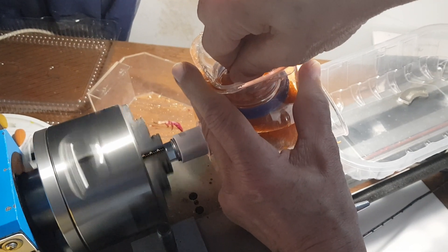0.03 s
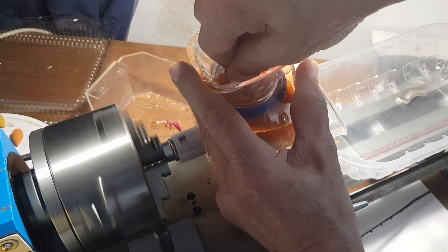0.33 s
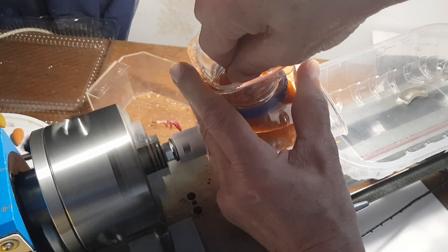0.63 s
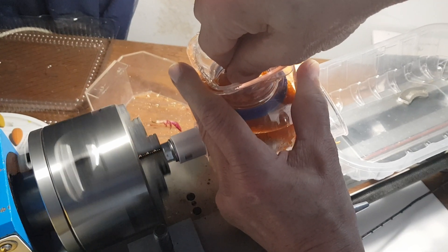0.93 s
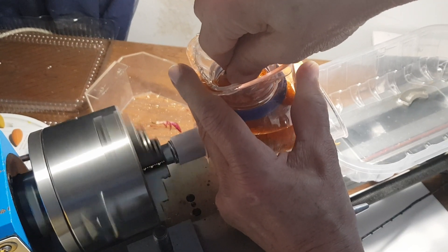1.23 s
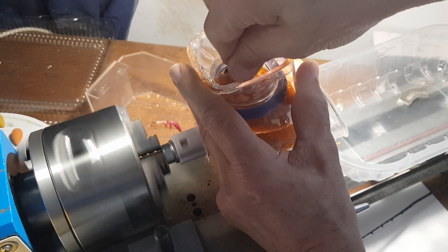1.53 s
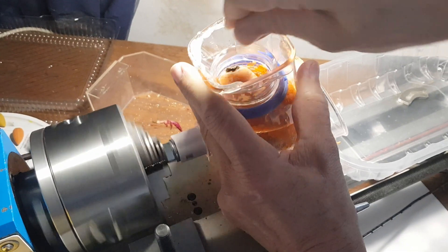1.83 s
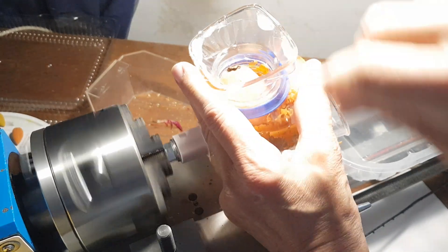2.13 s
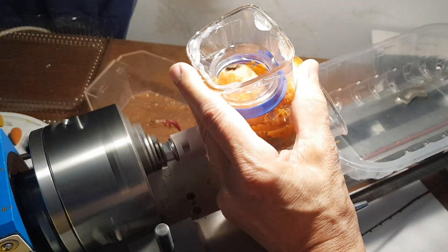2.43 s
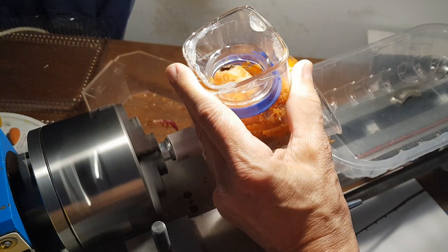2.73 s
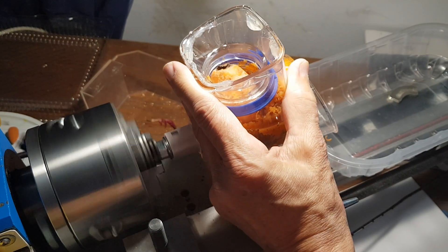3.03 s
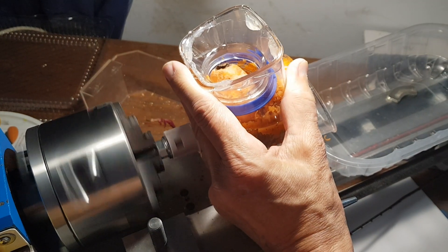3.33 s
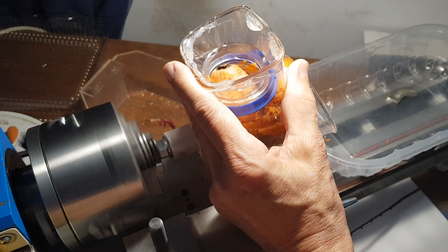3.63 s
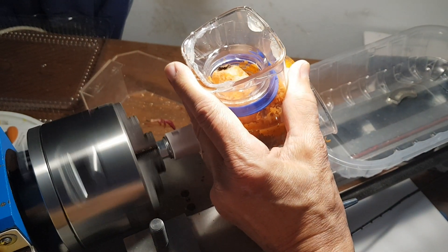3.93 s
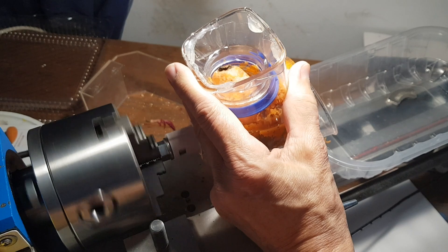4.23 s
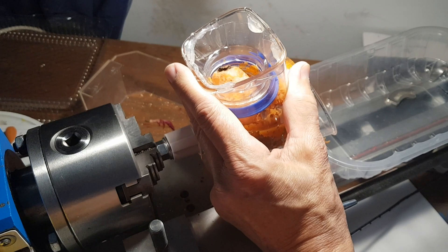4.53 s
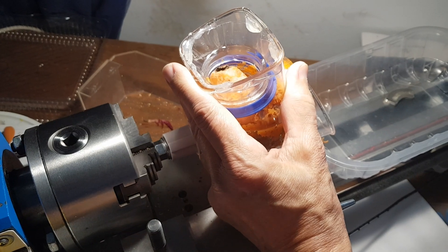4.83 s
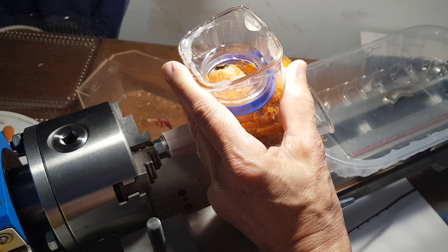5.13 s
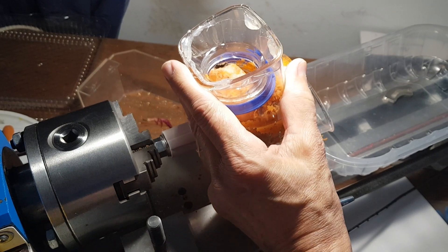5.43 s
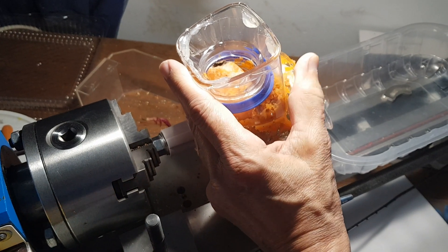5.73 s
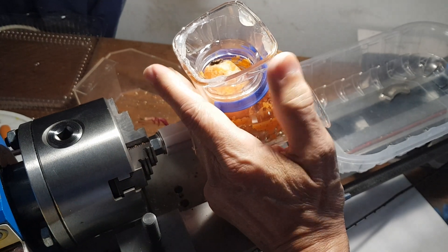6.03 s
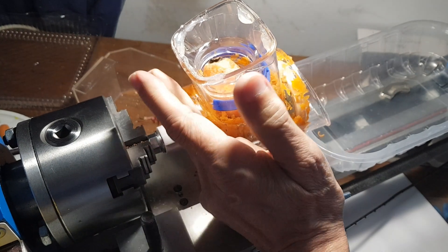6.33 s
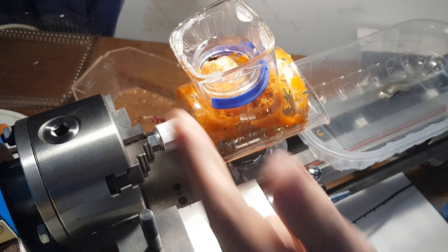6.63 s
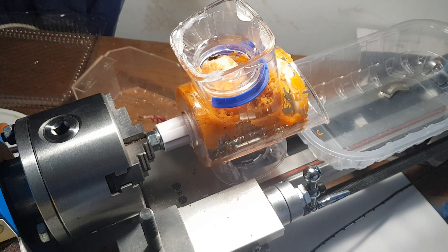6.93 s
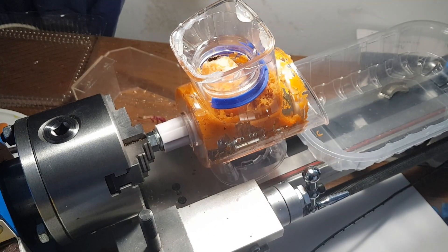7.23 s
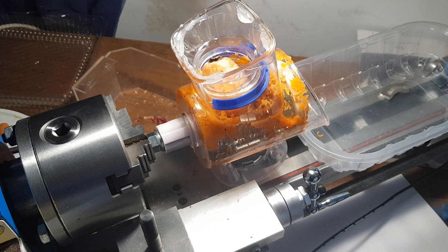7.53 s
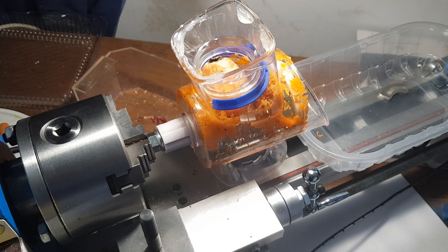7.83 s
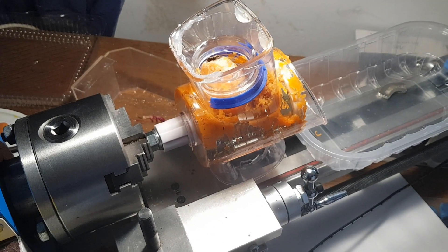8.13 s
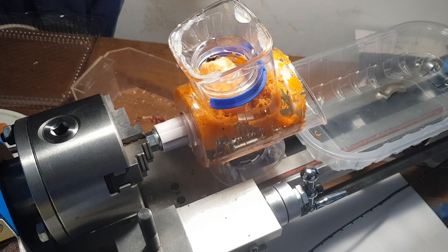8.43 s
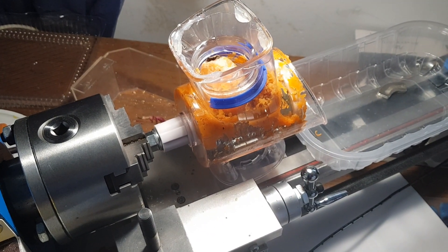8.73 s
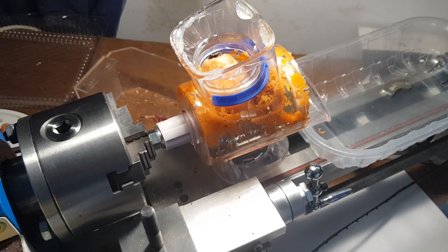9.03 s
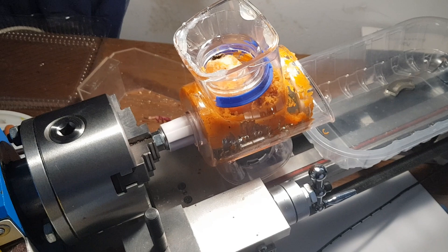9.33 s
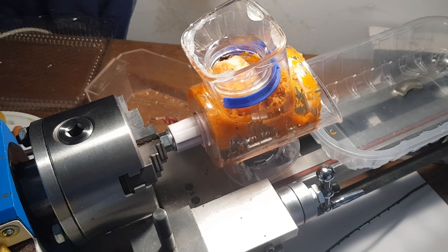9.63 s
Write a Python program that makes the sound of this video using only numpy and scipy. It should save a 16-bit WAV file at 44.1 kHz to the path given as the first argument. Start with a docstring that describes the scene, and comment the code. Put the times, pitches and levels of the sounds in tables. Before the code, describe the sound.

A small lathe drives a rasping vegetable grater until it knocks and clacks to a stop, followed by a few soft bumps.

```python
"""A motor hums, a drive whirs and blades shred vegetables twice a turn: a small lathe turns a plastic
drum grater. The pressure on the food eases, a piece knocks in the drum, and the machine stops with a
clatter and a sharp clack. Then soft rubbing and a few close bumps, over the faint hiss of the workshop.
Mains harmonics make the hum, dense clicks the whir, tearing and rubbing, ringing modes the knocks."""
import sys
import numpy as np
from scipy import signal
from scipy.fft import rfft, irfft
from scipy.io import wavfile
from scipy.ndimage import uniform_filter1d

SR = 44100
rng = np.random.default_rng(int(sys.argv[2]) if len(sys.argv) > 2 else 0)


def dump(signal):
    """Clip the signal to [-1, 1] and save it as 16-bit WAV at the path in sys.argv[1]."""
    limited = np.clip(np.atleast_2d(signal).T, -1, 1)
    pcm = np.round(limited * 32767).astype(np.int16)
    wavfile.write(sys.argv[1], SR, pcm)


N = 432180
T = np.arange(N) / SR
SIDES = np.array([[1], [-1]])  # left, right
MAINS_HZ, TURN_HZ = 50, 3.96
FIRST_CUT_S, STOP_S = 0.002, 4.0


def amp(db):
    """dB to gain."""
    return 10 ** (np.asarray(db) / 20)


def unit(x):
    """Scale to rms 1."""
    return x / np.sqrt(np.mean(x ** 2))


def response(points, size):
    """An (f/Hz, value) table on the FFT bins."""
    hz, values = np.transpose(points)
    return np.interp(np.log(np.fft.rfftfreq(size, 1 / SR) + 1), np.log(hz), values)


def colour(x, points):
    """Filter by an (f/Hz, level/dB) table."""
    return irfft(rfft(x) * amp(response(points, x.shape[-1])), x.shape[-1])


def ring(x, resonances):
    """Pass through (f/Hz, width/Hz, level/dB) resonances; rms 1."""
    size = x.shape[-1]
    f = np.fft.rfftfreq(size, 1 / SR) + 1
    body = sum((-1) ** k * amp(db) / (1 + 1j * (f * f - hz * hz) / (f * width_hz))
               for k, (hz, width_hz, db) in enumerate(resonances))
    return unit(irfft(rfft(x) * body, size))


def stereo(pair):
    """Mid and side to left and right, alike in the bass."""
    # stereo width: f/Hz, side minus mid/dB
    width = [(50, -16.5), (200, -15), (380, -13.5), (500, -3), (720, -9.5), (1000, -5), (1400, 0),
             (2000, -5.5), (2800, -2), (6000, -0.5), (9000, -10), (13000, -16.5)]
    return pair[0] + SIDES * colour(pair[1], width)


def place(x, pan, lead):
    """Position a sound by (f/Hz, L-R/dB) and (f/Hz, left lead/rad) tables."""
    return irfft(rfft(x) * amp(SIDES * response(pan, N) / 2) * np.exp(0.5j * SIDES * response(lead, N)), N)


def noise(points, size=N):
    """Coloured stereo noise; rms 1."""
    return unit(colour(stereo(rng.standard_normal((2, size))), points))


def grains(per_s, spread_db, size=N):
    """Dense stereo clicks of uneven size; rms 1."""
    hits = rng.random(size) < per_s / SR
    gains = amp(spread_db * np.minimum(rng.exponential(size=size), 3))
    return unit(stereo(hits * gains * rng.choice([-1., 1.], (2, size))))


def walk(rate_hz):
    """Smooth random drift, spread near 1."""
    hold = int(SR / rate_hz)
    steps = np.repeat(rng.standard_normal(N // hold + 2), hold)
    return 1.3 * uniform_filter1d(uniform_filter1d(steps, hold), hold)[:N]


def swells(rows):
    """Envelope of Gaussian (t/s, peak/dB, length/s) swells."""
    return sum(amp(db) * np.exp(-(2 * (T - s) / length_s) ** 2) for s, db, length_s in rows)


def add(out, s, sound):
    """Mix a short sound in at time s."""
    i = int(s * SR)
    out[:, i:i + sound.shape[-1]] += sound[..., :N - i]


def strikes(blows, modes, crack, crack_db, crack_t60_s):
    """Each blow cracks and rings the body's modes; a soft contact cuts the treble."""
    out, t = np.zeros((2, N)), T[:16384]
    for s, db, cutoff_hz in blows:
        sound = amp(crack_db - 60 * t / crack_t60_s) * noise(crack, size=len(t))
        for hz, mode_db, t60_s in modes:
            # higher modes reach the two sides less in step
            phase = rng.uniform(0, 2 * np.pi) + SIDES * rng.normal() * min(hz / 2000, 1)
            detuned_hz = hz * (1 + 0.015 * rng.normal())
            sound += amp(mode_db - 60 * t / t60_s) * np.sin(2 * np.pi * detuned_hz * t + phase)
        add(out, s, amp(db) * signal.lfilter(*signal.butter(1, cutoff_hz, fs=SR), sound))
    return out


def room(x, wet_db, low_t60_s=0.44, high_t60_s=0.3):
    """Add a diffuse workshop echo whose treble dies first."""
    t = T[:32768]
    low = noise([(100, 7.5), (400, -4.5), (2000, -9.5), (4000, -10.5), (9000, -35.5)], size=len(t))
    high = noise([(1500, -29.5), (4500, 0.5), (14000, -3.0)], size=len(t))
    onset = np.clip(t / 0.012 - 0.5, 0, 1)
    tail = onset * (low * amp(-60 * t / low_t60_s) + 1.3 * high * amp(-60 * t / high_t60_s))
    return x + amp(wet_db) * signal.fftconvolve(x, unit(tail) / np.sqrt(len(t)), axes=1)[:, :N]


def workshop(rise_at_s=6.7, rise_s=0.59):
    """Steady hiss over a low rumble; a narrow band of hiss grows late."""
    # steady and late spectra: f/Hz, level/dB
    steady = [(25, -69), (45, -63.5), (110, -65), (280, -83.5), (650, -80.5), (1000, -87), (1600, -89.5),
              (1900, -77.5), (2150, -74), (2700, -88.5), (3250, -81.5), (3900, -93.5), (5200, -93),
              (7500, -99), (13000, -89.5), (16000, -93)]
    late = [(1500, -48), (2000, -4), (2200, -4), (2450, -11), (3000, -37)]
    # balance: f/Hz, L-R/dB
    pan = [(300, -0.5), (750, 2), (1200, 7), (1600, -2.5), (2400, 0), (3100, 0.5), (3600, -2.5), (4800, -7),
           (7000, 1), (9800, 0.5), (13000, -0.5)]
    # phase: f/Hz, left lead/rad
    lead = [(300, -0.68), (1000, -1.9), (1900, -2.3), (2400, -0.87), (3000, 0.34), (4300, 1.8), (7000, 0.6)]
    rise = np.clip((T - rise_at_s) / rise_s, 0, 1)
    return place(noise(steady) * amp(-64) + noise(late) * amp(-75) * rise, pan, lead)


def rustle(hz, width_hz, spread_db, size):
    """Tiny slips, twice filtered to one band; rms 1."""
    band = [(hz, width_hz, 0)]
    return ring(ring(grains(5000, spread_db, size), band), band)


def touches():
    """Fingers tap and shift on plastic; a sleeve brushes past."""
    # finger taps: t/s, level/dB, f/Hz, width/Hz, t60/s
    taps = [(5.814, -56, 650, 230, 0.13), (5.995, -63, 1300, 450, .07), (6.018, -60, 1400, 450, .07),
            (6.161, -59, 1400, 400, .09), (6.282, -57, 330, 120, .09), (6.566, -59, 330, 120, .1),
            (6.676, -62, 1300, 450, .06), (6.8105, -64, 1200, 400, 0.14), (7.951, -66, 504, 170, .08),
            (8.126, -59.5, 3360, 450, 0.083), (9.012, -42, 1720, 700, 0.013),
            (9.0578, -43, 1500, 500, 0.016), (9.057, -58, 11500, 2000, .012)]
    # sleeve brushes: t/s, peak/dB, length/s, f/Hz
    brushes = [(5.54, -75, .12, 5100), (6.154, -77, .2, 5200), (7.801, -76, .2, 1960),
               (8.17, -75, .09, 3700), (8.2, -76, 0.14, 5300), (8.3, -77, .12, 6000)]
    out, t = np.zeros((2, N)), T[:8192]
    for s, db, hz, width_hz, t60_s in taps:
        add(out, s, rustle(hz, width_hz, spread_db=2.2, size=len(t)) * amp(db - 60 * t / t60_s))
    t = T[:16384] - T[8192]
    for s, db, length_s, hz in brushes:
        envelope = amp(db) * np.exp(-(2 * t / length_s) ** 2)
        add(out, s + t[0], rustle(hz, 0.24 * hz, spread_db=2, size=len(t)) * envelope)
    return out


def rubbing(attack_s=0.021, release_db_per_s=71):
    """A hand rubs in tiny slips, fingers slide, and the rub deepens as the palm presses."""
    # hand and sleeve strokes: t/s, length/s, level/dB
    strokes = [(4.244, 0.039, -58.5), (4.38, 0.16, -56.5), (4.658, 0.31, -58), (5.07, 0.1, -57),
               (5.433, 0.091, -59), (5.794, 0.63, -59), (6.437, 0.27, -60.5), (6.81, 0.088, -60),
               (7.174, 0.041, -65), (7.373, 0.71, -64.5), (7.698, 0.1, -58.5), (8.471, 0.54, -73),
               (9.498, 0.33, -65)]
    # finger slides and palm presses: t/s, peak/dB, length/s
    slides = [(9.007, -54.5, 0.025), (9.014, -46.5, 0.011), (9.047, -53.5, 0.043), (9.096, -59.5, 0.079)]
    presses = [(5.974, -57.5, .16), (6.14, -61, 0.11), (6.287, -58, 0.095), (6.575, -58, 0.11),
               (6.716, -54, 0.053), (7.78, -57.5, 0.17)]
    # friction spectra: f/Hz, level/dB
    rub_spectrum = [(50, 2), (110, 4), (250, -6.5), (380, -0.5), (500, -6), (600, -10.5), (750, -11.5),
                    (950, -20.5), (1200, -11.5), (1700, -28.5), (3200, -24.5), (7000, -41)]
    slide_spectrum = [(200, -10), (600, 11), (1300, 1), (1900, -8), (2800, -2), (4000, -12), (6000, -19),
                      (8500, -37), (12000, -30), (16000, -36)]
    press_spectrum = [(60, -10), (140, -2), (250, 1), (370, -1), (520, -12), (900, -24), (2500, -44)]
    power = 0
    for s, length_s, db in strokes:
        attack = np.clip((T - s) / attack_s, 0, 1)
        power += (attack * amp(db - release_db_per_s * np.maximum(T - s - length_s, 0))) ** 2
    envelope = np.sqrt(power) * amp(2 * walk(30))
    rub = unit(colour(grains(1400, 1.84), rub_spectrum)) * envelope
    return rub + noise(slide_spectrum) * swells(slides) + noise(press_spectrum) * swells(presses)


def bumps(drag_s=0.025, drag_max_db=-52):
    """Fingers bump a nearby case: one heavily damped swing each, with a soft drag of skin."""
    # finger bumps: t/s, level/dB, f/Hz, L-R/dB
    hits = [(6.567, -52, 330, 0), (7.49, -53.5, 520, 8), (8.48, -51, 446, -13), (8.505, -44, 420, -7),
            (8.568, -56, 272, -19), (8.683, -49, 473, -4), (8.709, -44, 460, 7), (8.715, -44, 160, -4),
            (8.754, -54.5, 190, -16), (8.814, -52, 298, 6), (8.859, -52.5, 200, 5), (8.895, -50, 385, 5),
            (8.933, -49.5, 300, -10), (9.012, -29, 650, 2), (9.015, -25, 357, 9.5),
            (9.0575, -40.5, 1210, 16), (9.109, -54, 200, 14)]
    # skin drag: f/Hz, level/dB
    drag_spectrum = [(50, 6), (120, 7.5), (250, -5.5), (500, -6), (750, -14.5), (1100, -41), (3000, -43)]
    out, t = np.zeros((2, N)), T[:4096]
    for s, db, hz, pan_db in hits:
        cycles = hz * t - 2
        swing = np.exp(-(cycles / 0.6) ** 2) * np.cos(2 * np.pi * cycles)
        add(out, s - 2 / hz, amp(db + SIDES * pan_db / 2) * swing)
        drag = noise(drag_spectrum, size=len(t)) * np.exp(-(2 * t / drag_s - 2) ** 2)
        add(out, s + 0.0078 - drag_s, amp(min(db - 4, drag_max_db)) * drag)
    return room(out, wet_db=-20.5)


def bench():
    """Muffled knocks ring the bench."""
    # knocks: t/s, relative level/dB, cutoff/Hz
    blows = [(3.794, -37, 4000), (4.347, -46.5, 500), (5.151, -45, 1510), (5.158, -38.5, 3000),
             (5.174, -59, 3000), (5.19, -53.5, 2000), (5.473, -51.5, 1020), (6.168, -64, 3000)]
    # bench modes: f/Hz, level/dB, t60/s
    modes = [(353, -14, 0.47), (436, -0.5, 0.092), (600, -8, 0.04), (681, -0.5, 0.052), (924, -10.5, 0.12),
             (1080, -18, 0.15), (1274, -8, 0.12), (2300, -12.5, 0.11)]
    # contact noise: f/Hz, level/dB
    crack = [(100, -23.5), (350, 2), (480, -17), (720, -2.5), (950, 0), (1250, -8), (1600, -15),
             (2300, -28), (4000, -39)]
    knocks = strikes(blows, modes, crack, crack_db=-6.5, crack_t60_s=0.12) * amp(-5)
    muffled = colour(knocks, [(150, -22), (300, 4.0), (2400, 9.0), (3500, -20.5), (8000, -50)])
    return room(muffled, wet_db=-8)


def thuds():
    """Soft, deep swings of a few cycles."""
    # low thuds and a small tock: t/s, level/dB, f/Hz, half-length/s
    pulses = [(1.365, -25, 39.2, 0.03), (1.595, -38, 43, 0.039), (2.525, -34.5, 146, 0.012),
              (3.647, -25.5, 41.7, 0.02), (3.917, -33.5, 40, 0.022), (4.083, -34, 41, 0.026),
              (6.687, -44, 150, 0.0046), (6.719, -63, 270, 0.008), (7.495, -49, 504, 0.0058)]
    return sum(amp(db) * np.exp(-((T - s) / half_s) ** 2) * np.cos(2 * np.pi * hz * (T - s))
               for s, db, hz, half_s in pulses)


def scrapes():
    """A piece sticks and slips along the container and leaves it ringing."""
    # scrapes: t/s, peak/dB, length/s
    runs = [(2.284, -38.5, .024), (2.403, -36, 0.017), (2.416, -38, 0.022)]
    # container resonances: f/Hz, width/Hz, level/dB
    container = [(1200, 66, 10.5), (1750, 390, 3), (2470, 70, 3.5), (2700, 55, 5.5), (3570, 75, 4.5),
                 (4200, 570, -8.5), (5140, 220, -8), (6000, 280, -12.5), (7200, 400, -18),
                 (13400, 3100, -12)]
    slips = grains(4000, 0.67) * swells(runs)
    return ring(slips, container) * np.std(slips)


def chute_ticks():
    """A hard piece ticks against the hollow feed chute."""
    # ticks: t/s, level/dB, cutoff/Hz
    blows = [(2.5122, -27, 8900), (2.5165, -26, 3000), (2.5245, -32, 5000)]
    # chute modes: f/Hz, level/dB, t60/s
    modes = [(258, -6, 0.036), (1450, -0.5, 0.037), (1710, 1.5, 0.039), (3580, -5, 0.028),
             (4900, -8, 0.011)]
    # contact noise: f/Hz, level/dB
    crack = [(100, -18), (600, -8), (1500, 5), (2600, -4), (3600, -1), (5200, -1), (6500, -17), (8200, -31),
             (13000, -13), (16000, -22)]
    return strikes(blows, modes, crack, crack_db=-6.5, crack_t60_s=0.034)


def drum_knocks(bounce_s=0.0033):
    """The plastic drum chatters in its housing: five blows a knock, each weaker than the last."""
    # knocks: t/s, relative level/dB, cutoff/Hz, loss per bounce/dB
    knocks = [(3.799, -40.5, 1500, 1), (3.982, -30, 3986, 1), (3.9925, -16.5, 3490, 2.2)]
    # drum modes: f/Hz, level/dB, t60/s
    modes = [(364, -13.5, 0.2), (528, -13.5, 0.12), (793, -6.5, 0.05), (1200, -2, 0.038), (1430, -3, 0.069),
             (1848, -5, 0.045), (1920, -7, 0.044), (2200, 3.5, 0.03), (2930, -12.5, .03),
             (3390, -10, 0.023), (4256, -15, 0.03)]
    # contact noise: f/Hz, level/dB
    crack = [(100, -7.5), (400, -8), (1000, -1), (1800, -5.5), (2800, -7.5), (4500, -12.5), (8000, -31),
             (13000, -1.5), (16000, -10)]
    blows = [(s + k * bounce_s, db - k * loss_db, cutoff_hz)
             for s, db, cutoff_hz, loss_db in knocks for k in range(5)]
    return strikes(blows, modes, crack, crack_db=-1, crack_t60_s=0.055) * amp(-3)


def stop_clack():
    """The lathe's steel clacks as it stops; small ticks follow."""
    # clacks and ticks: t/s, level/dB, cutoff/Hz
    blows = [(4.0455, -14, 19900), (4.0545, -22.5, 4000), (4.064, -19.5, 1200), (4.25, -51, 1500),
             (4.266, -45, 1500), (4.3425, -43.5, 4500), (4.349, -49, 1200)]
    # steel modes: f/Hz, level/dB, t60/s
    modes = [(409, -17.5, 0.15), (490, -15.5, 0.07), (739, -14.5, 0.1295), (1162, -11.5, 0.064),
             (1500, -13.5, .04), (1820, -16.5, 0.032), (2450, -13, 0.027)]
    # contact noise: f/Hz, level/dB
    crack = [(100, -17.5), (230, -21.5), (350, -6), (520, -0.5), (1100, -9.5), (1450, -10), (2150, -1.5),
             (2800, -13.5), (3600, -5), (5000, -9.5), (7700, -18), (8600, -31.5), (11000, -10.5),
             (14000, -6), (15800, -15)]
    # balance: f/Hz, L-R/dB
    pan = [(300, 1.5), (1400, -1), (3700, -6), (6000, -12.5), (7500, -13), (9000, 3.5), (13000, -1.5),
           (15000, 2)]
    # phase: f/Hz, left lead/rad
    lead = [(300, -1.7), (600, .7), (900, -1), (1300, 3.2), (2000, 2.5), (3000, -.6), (5000, -2),
            (12000, 0.5)]
    clacks = strikes(blows, modes, crack, crack_db=-1.5, crack_t60_s=0.053)
    return place(room(clacks, wet_db=-12.5), pan, lead)


def load_at(s, ease_at_s=1.05, decay_s=1.04):
    """Drum load: 1 while the food is pressed down, then fading."""
    return np.exp(-np.maximum(s - ease_at_s, 0) / decay_s)


def hum(load, load_db=2, flutter_db=0.6, waver_db=2.5):
    """Magnetic pull shakes the motor at even mains multiples; the lowest line rises with load."""
    # hum lines: mains multiple (rounded to even), level/dB, L-R/dB (overtones only)
    lines = [(4, -37, -2.5), (6, -71, -2), (8, -52.5, 0), (9.96, -67, 19.5), (12, -60.5, 11.5),
             (14, -70, 8), (16, -56.5, -3), (18, -58.5, -16), (19.88, -56.5, 2.5), (22, -68, 8.5),
             (24, -60, -2.5), (26, -68.5, -6), (28, -59.5, -11.5), (34, -76, -0.5), (36, -75.5, -2.5),
             (66, -76, -3.5), (68, -75, -4), (70, -71, -8.5), (72, -70, -12)]
    out, mains_phase = 0, 2 * np.pi * MAINS_HZ * T + 0.023 * walk(20)
    for k, (multiple, db, pan_db) in enumerate(lines):
        overtone = k > 0
        swing_db = waver_db * walk(20) if overtone else load_db * load + flutter_db * walk(20)
        blur = 0.011 * multiple * walk(90) * overtone  # rattling shakes overtones out of step
        phase = 2 * np.round(multiple / 2) * mains_phase + blur + rng.uniform(0, 2 * np.pi)
        out += np.sqrt(2) * amp(db + swing_db + SIDES * pan_db / 2 * overtone) * np.sin(phase)
    return out


def drive(load, swish):
    """Gears and bearings rattle in step with the hum; load brings out the housing's resonances."""
    # gear whir: f/Hz, level/dB
    whir_spectrum = [(40, -33), (75, -7.5), (130, -8), (200, -6.5), (290, -10), (380, -5), (480, -15),
                     (700, -15), (1100, -25.5), (1450, -15), (1950, -22), (2400, -30.5), (4700, -37.5),
                     (8000, -67.5)]
    # grater housing resonances: f/Hz, width/Hz, level/dB
    housing = [(349, 31, -3), (418, 35, -6), (596, 39, 1), (738, 26, 7), (801, 49, 0.5), (1236, 180, -8),
               (1400, 39, -5), (1815, 83, -8), (2000, 80, -8.5), (2742, 110, -19), (4770, 127, -17.5)]
    buzz = 1 + 0.6 * np.cos(2 * np.pi * 4 * MAINS_HZ * T)
    whir = unit(colour(grains(6000, 3.6) * buzz, whir_spectrum))
    rattle = ring(grains(2500, 2.75) * buzz, housing)
    # a small loose part sings, tapped at every swing of the field
    taps = np.cos(2 * np.pi * MAINS_HZ * T) ** 10
    sing = ring(grains(5460, 2) * taps, [(3290, 110, 0)]) * amp(-79 + 2.19 * walk(25))
    whir_db = -45 + 3.5 * load + 1.25 * walk(25)
    rattle_db = -53.5 + 14.5 * load + 1.1 * swish + walk(30)
    return whir * amp(whir_db) + rattle * amp(rattle_db) + sing


def cuts(length_s=0.035, jitter_s=0.011, trailing_db=-10, focus_hz=1040, scatter_octaves=0.21):
    """Two blade rows bite in turn, harder under load: t/s, tear/dB, rasp/dB, length/s, f/Hz."""
    k = np.arange(int(2 * TURN_HZ * STOP_S))
    late, strong, high = rng.standard_normal((len(k), 3)).T
    s = FIRST_CUT_S + k / (2 * TURN_HZ) + jitter_s * late
    bite_db = trailing_db * (k % 2) + 0.5 * strong
    tear_db = -53 + 2 * load_at(s) + bite_db
    rasp_db = -56.5 + 9 * load_at(s) + bite_db
    hz = focus_hz * 2 ** (scatter_octaves * high)
    return np.column_stack([s, tear_db, rasp_db, np.full(len(k), length_s), hz])


def rasps(bites, focus_db_per_octave=10):
    """Each bite's fractures ring the drum, most near its own pitch; the food detunes it a little."""
    # hollow drum resonances: f/Hz, width/Hz, level/dB
    drum = [(400, 79, 4), (740, 70, 5.5), (996, 210, -1.5), (1386, 97, 4), (1868, 99, 2), (2740, 150, -4.5),
            (3520, 190, -7)]
    out, t = np.zeros((2, N)), T[:8192] - T[4096]
    for s, db, length_s, focus_hz in bites:
        detune = 1 + 0.036 * rng.normal()
        body = [(hz * detune, width_hz, mode_db - focus_db_per_octave * abs(np.log2(hz / focus_hz)))
                for hz, width_hz, mode_db in drum]
        burst = ring(grains(2000, 2.4, size=len(t)), body) * amp(db) * np.exp(-(2 * t / length_s) ** 2)
        add(out, max(s + t[0], 0), burst[:, s + t >= 0])
    return out


def shredding(load, swish):
    """Blades tear countless cells; each cut and each caught piece rasps in the drum."""
    # blades catching loose pieces: t/s, tear/dB, rasp/dB, length/s, rasp focus/Hz
    catches = [(0.043, -48, -34, 0.033, 940), (0.197, -45.5, -37.5, 0.091, 1500),
               (0.28, -53, -38, 0.016, 1200), (0.316, -43, -37.5, 0.037, 750),
               (0.352, -43, -48, 0.017, 780), (0.486, -63, -36, 0.028, 1590), (0.556, -49, -37, .026, 860),
               (0.602, -44, -38, .02, 780), (0.756, -58, -38.5, 0.026, 1400),
               (0.823, -55, -37, 0.029, 1490), (0.859, -45, -37, .025, 800), (0.971, -45, -41, 0.017, 1600),
               (1.02, -59, -32.5, 0.019, 1200), (1.091, -58, -37.5, 0.024, 740),
               (1.289, -65, -37, 0.062, 1450), (1.485, -50, -35.5, 0.021, 1300),
               (1.539, -48.5, -38.5, 0.034, 1780), (1.623, -49, -40, 0.022, 1500),
               (1.738, -58, -37, .018, 1300), (1.792, -63, -40.5, 0.025, 1700),
               (1.879, -51.5, -39.5, 0.027, 750), (1.989, -55, -36.5, 0.022, 1520),
               (2.049, -54, -43, 0.037, 1600), (2.131, -59, -40, 0.03, 740), (2.245, -52, -43, 0.049, 1500),
               (2.375, -54, -54, 0.056, 1500), (2.627, -53, -45, 0.037, 1550), (2.752, -53, -52, .03, 1400),
               (2.891, -64, -46, .025, 1600), (3.08, -66, -46, 0.016, 1400), (3.268, -58, -45, 0.02, 1500),
               (3.323, -54.5, -49, 0.033, 1500), (3.524, -58, -39, 0.016, 1300)]
    # tearing: f/Hz, level/dB
    tear_spectrum = [(300, -31), (700, -7), (1100, -1), (1900, 1), (2300, -6), (3300, -6.5), (5000, -9),
                     (6500, -18), (8200, -29), (10000, -21), (12700, -10.5), (15800, -21.5)]
    s, tear_db, rasp_db, length_s, hz = np.vstack([cuts(), catches]).T
    steady_db = -59 + 14.5 * load + 0.44 * swish + walk(40)
    envelope = np.hypot(amp(steady_db), swells(zip(s, tear_db, length_s)))
    tearing = unit(colour(grains(7000, 2.5), tear_spectrum)) * envelope
    return tearing + rasps(zip(s, rasp_db, length_s, hz))


def machine(hum_fall_db_per_s=700, coast_db_per_s=65):
    """The lathe, slightly right: the hum ends with the current, the drum coasts a moment longer."""
    # balance: f/Hz, L-R/dB
    pan = [(300, -1.5), (700, -1), (1400, -3.5), (2400, -1), (3700, -3), (6000, -15.5), (7500, -12),
           (9000, 2), (13000, -4), (15000, 5)]
    # phase: f/Hz, left lead/rad
    lead = [(300, -0.05), (690, -0.15), (1050, 0.6), (1500, .7), (2000, 0.48), (2700, 0.12), (4500, 1),
            (7000, -0.51), (8500, 0)]
    load = load_at(T)
    swish = np.cos(2 * np.pi * 2 * TURN_HZ * (T - FIRST_CUT_S))  # two blade rows a turn
    stopped_s = np.maximum(T - STOP_S, 0)
    motor = hum(load) * amp(-hum_fall_db_per_s * stopped_s)
    turning = (drive(load, swish) + shredding(load, swish)) * amp(-coast_db_per_s * stopped_s)
    contacts = room(drum_knocks() + chute_ticks() + scrapes(), wet_db=-10.5)
    return motor + place(turning + contacts, pan, lead) + stop_clack()


def scene():
    """Bench, machine, thuds, hands and hiss."""
    return bench() + machine() + thuds() + rubbing() + bumps() + touches() + workshop()


def record(dry, low_hz=18, top_hz=15800):
    """Cut the deepest bass and the top."""
    dry = signal.sosfilt(signal.butter(2, low_hz, "high", fs=SR, output="sos"), dry)
    return signal.sosfilt(signal.ellip(10, 0.2, 80, top_hz, fs=SR, output="sos"), dry)


dry = scene()
out = record(dry)
dump(out)
```